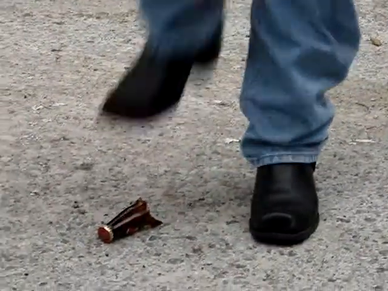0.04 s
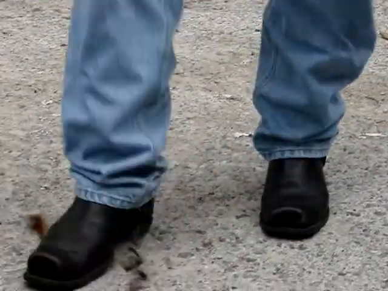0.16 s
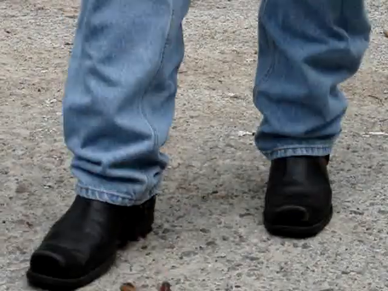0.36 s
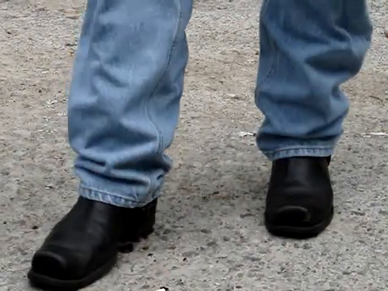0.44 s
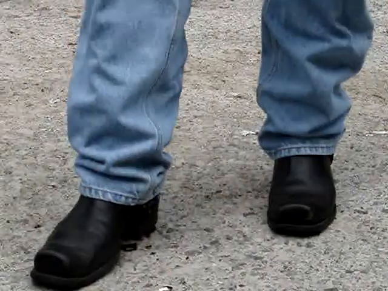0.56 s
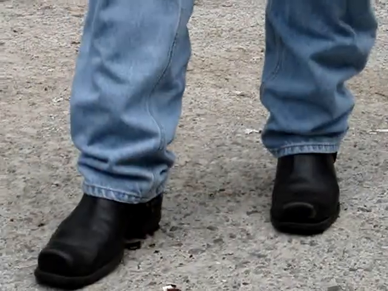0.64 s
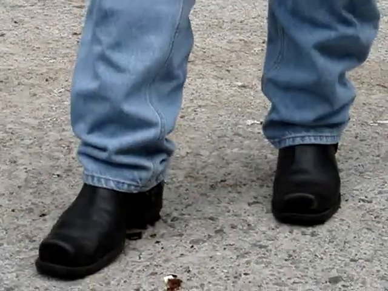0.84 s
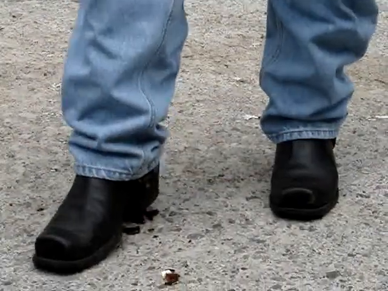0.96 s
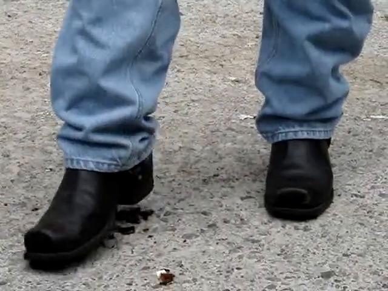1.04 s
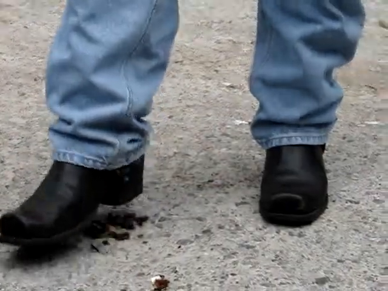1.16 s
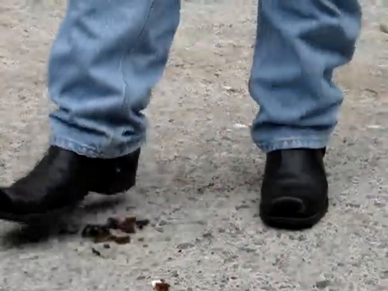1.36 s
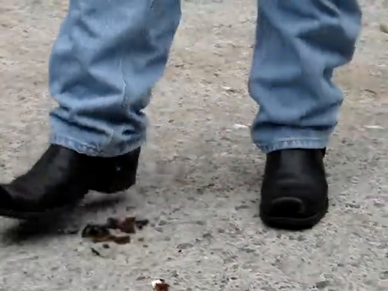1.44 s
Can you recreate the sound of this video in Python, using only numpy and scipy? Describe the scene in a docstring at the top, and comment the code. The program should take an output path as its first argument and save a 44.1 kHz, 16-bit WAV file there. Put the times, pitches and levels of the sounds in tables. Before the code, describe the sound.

Close by on outdoor pavement, a boot stomps and crushes a glass bottle neck. Flakes tinkle, a loose piece rolls away ringing and splinters crackle underfoot, with faint birds, light wind and a far-off roar behind.

```python
"""On open pavement, close to the microphone, a boot stamps on a glass bottle neck. The heel thuds, the
glass collapses in a few quick bursts of tiny fractures, flakes tinkle, a loose piece skitters away
ringing, and splinters crack as the foot shifts. Farther off, birds whistle over a distant roar, and
light wind rumbles on the microphone. Automatic gain drops at the blow and recovers slowly."""
import sys
import numpy as np
from scipy import signal
from scipy.fft import rfft, irfft
from scipy.io import wavfile
from scipy.ndimage import uniform_filter1d

SR = 44100
rng = np.random.default_rng(int(sys.argv[2]) if len(sys.argv) > 2 else 0)


def digitize_waveform(pressure):
    """Quantize a signal to 16-bit integers and store it at the path in sys.argv[1].

    Rows of a 2-D input are taken as channels; values are limited to [-1, 1].
    """
    field = np.atleast_2d(pressure).T
    bounded = np.clip(field, -1, 1)
    quanta = np.round(bounded * 32767).astype(np.int16)
    wavfile.write(sys.argv[1], SR, quanta)


N = 66150
T = np.arange(N) / SR


def undb(db):
    """Decibels to gain."""
    return 10 ** (np.asarray(db) / 20)


def unit(x):
    """Scale to rms 1."""
    return x / np.sqrt(np.mean(x ** 2) + 1e-18)


def curve(rows):
    """Gain along (s, dB) points."""
    return undb(np.interp(T, *np.array(rows).T))


def fade(start, t60):
    """A sudden start, then a fall of 60 dB every t60 seconds."""
    return (T >= start) * np.exp(-np.log(1000) * np.maximum(T - start, 0) / t60)


def noise():
    """White noise."""
    return rng.standard_normal(N)


def walk(rate_hz):
    """A smooth random wander with rms 1."""
    span = int(SR / rate_hz)
    return unit(uniform_filter1d(uniform_filter1d(noise(), span), span))


def band(x, hz, width):
    """One resonance; width is a share of the centre frequency."""
    w = 2 * np.pi * min(hz / SR, .45)
    a = np.sin(w) * width / 2
    return signal.lfilter([a, 0, -a], [1 + a, -2 * np.cos(w), 1 - a], x)


def lowpass(x, hz):
    """A gentle treble cut."""
    return signal.sosfilt(signal.butter(2, hz, fs=SR, output="sos"), x)


def colour(x, rows):
    """Causal filter through (Hz, dB) points."""
    hz, db = np.array(rows).T
    bins_hz = np.maximum(np.arange(N + 1) * SR / (2 * N), 1)
    gain = undb(np.interp(np.log(bins_hz), np.log(hz), db))
    cepstrum = irfft(np.log(gain))
    cepstrum[1:N] *= 2  # minimum phase: nothing sounds ahead of a hit
    cepstrum[N + 1:] = 0
    return irfft(rfft(x, 2 * N) * np.exp(rfft(cepstrum)))[:N]


def ticks(per_s, spread_db):
    """Random tiny fractures or contacts, most weak and a few strong."""
    impulses = (rng.random(N) < per_s / SR) * np.sign(noise())
    return impulses * undb(spread_db * np.minimum(rng.exponential(size=N), 4))


def echo(x, t60):
    """Diffuse reflections that build up and die away."""
    tail = noise() * fade(0, t60) * (1 - fade(0, 0.053))
    return signal.fftconvolve(x, tail / np.linalg.norm(tail))[:N]


# Colour of the roar from far off. Each row: frequency in Hz, gain in dB.
ROAR_COLOUR = [(18, -30.5), (30, -14.5), (70, -7.5), (325, -4), (414, -3), (673, -1.5), (1040, 2),
               (2110, -7.5), (2270, -7), (3600, -15.5), (4710, -21.5), (7120, -28.5), (7840, -27.5),
               (10000, -36), (13000, -39.5), (22000, -120)]
# The roar as heard, creeping slowly back up after the stamp. Each row: time in seconds, level in dB.
ROAR_LEVEL = [(0, -46), (.22, -45.5), (.45, -46), (.75, -45), (1.05, -44), (1.25, -43), (1.5, -44)]
def distant_roar():
    """A nearly steady outdoor roar with little treble."""
    return unit(colour(noise(), ROAR_COLOUR)) * curve(ROAR_LEVEL)


# Gusts at the microphone. Each row: time in seconds, level in dB.
WIND_LEVEL = [(0, -72), (.05, -51.5), (.15, -52.5), (.22, -51), (.3, -62), (.7, -85.5), (.8, -59),
              (1.5, -63)]
def wind(hz=103, width=2.4):
    """Light wind rumbles on the microphone."""
    rumble = band(band(noise(), hz, width), hz, width)
    return unit(rumble) * curve(WIND_LEVEL)


def whistle(start, length, first_hz, last_hz, db, bend=1.28, waver=0.00797, edge_s=0.0047):
    """One wavering slur of a bird's voice."""
    along = np.clip((T - start) / length, 0, 1)
    glide_hz = first_hz + (last_hz - first_hz) * along ** bend
    hz = glide_hz * (1 + waver * walk(149))
    swell = np.minimum(np.minimum(along, 1 - along) * length / edge_s, 1)
    return undb(db) * swell * np.sin(2 * np.pi * np.cumsum(hz) / SR)


# Song some way off. Each row: start and length in seconds, first and last pitch in Hz, level in dB.
SONG_NOTES = [(0.049, 0.034, 3380, 2893, -47.5), (0.068, 0.097, 3700, 3620, -54.5),
              (.075, 0.12, 2538, 2515, -53), (0.191, 0.14, 2540, 2573, -42.5),
              (0.545, 0.022, 3230, 2700, -37), (.611, .035, 3230, 2610, -36.5),
              (0.647, 0.082, 2430, 2353, -44.5), (.95, 0.049, 2720, 3020, -50),
              (1.118, 0.021, 2820, 2700, -43.5), (1.154, 0.031, 3100, 3164, -35),
              (1.187, 0.0081, 3400, 2980, -28), (1.188, 0.0332, 2790, 2693, -35.5),
              (1.229, 0.041, 2270, 2253, -42.5), (1.262, 0.062, 2360, 2383, -46)]
# A farther bird repeats one falling chip. Each entry: start in seconds.
CHIP_STARTS = [.859, 1.007, 1.143, 1.26, 1.359, 1.449]
def birds():
    """Distant song and farther chips, fluttering and smeared by echoes from the trees."""
    song = sum(whistle(*note) for note in SONG_NOTES)
    chips = sum(whistle(start, 0.033, first_hz=4480, last_hz=3460, db=-50.5) for start in CHIP_STARTS)
    direct = (song + chips) * undb(3 * walk(220))
    return direct + echo(undb(-1.5) * song + undb(0.5) * chips, t60=0.6)


# Flakes landing around the boot. Each row: time in seconds, level in dB.
FLAKE_LEVEL = [(.225, -79.5), (.235, -20), (.253, -39), (.263, -53), (.275, -30.5), (.325, -33.5),
               (.36, -42), (.42, -44), (.53, -50), (.63, -49), (.66, -87), (.73, -62.5), (.8, -92),
               (.88, -57.5), (1.0, -77), (1.15, -104)]
def flakes(count=22, low_hz=4250, high_hz=9760, width_hz=130, tilt_db_per_octave=-1.5):
    """A shower of small pieces, each tinkling at its own pitch whenever it touches the ground."""
    pitches = np.geomspace(low_hz, high_hz, count) * (1 + 0.03 * rng.standard_normal(count))
    tinkle = 0
    for hz in pitches:
        contacts = ticks(per_s=88, spread_db=7)
        gain = undb(tilt_db_per_octave * np.log2(hz / low_hz))
        tinkle += gain * band(contacts, hz, width_hz / hz)
    return unit(tinkle) * curve(FLAKE_LEVEL)


# One piece rolling over the pavement. Each row: time in seconds, level in dB.
ROLL_LEVEL = [(.27, -88), (.3, -34), (.42, -44.5), (.52, -50), (.62, -86), (.75, -81), (.89, -52.5),
              (.96, -57), (1.05, -76)]
def rolling_piece(hz=7560, width_hz=150):
    """Quick small contacts keep a piece singing as it rolls."""
    contacts = ticks(per_s=190, spread_db=3.6)
    return unit(band(contacts, hz, width_hz / hz)) * curve(ROLL_LEVEL)


# Loose pieces nearby. Each row: start in seconds, pitch in Hz, level in dB, free ring in seconds.
BOUNCES = [(.2742, 7770, -23, .005), (0.283, 7700, -20.5, 0.011), (.3065, 7720, -26, 0.0053),
           (.347, 7650, -30, 0.019), (0.3634, 6490, -24.5, .007), (.375, 7660, -28, 0.015),
           (.398, 6340, -22, .005), (0.3983, 9030, -23.5, 0.0092), (.58, 7675, -38.5, 0.063),
           (0.6785, 7680, -25, 0.013), (0.716, 7760, -26, 0.021), (0.794, 7750, -37.5, 0.0036),
           (0.8292, 7700, -24, 0.014), (0.87, 7640, -40.5, 0.018), (1.123, 5660, -36.5, .004),
           (1.19, 5590, -42, 0.0024), (1.211, 5600, -44, 0.0036)]
def bouncing_shards(rise_s=0.00048, stop_t60_s=0.0097, wander_hz=44.8):
    """Larger pieces ring until the next contact stops them, wobbling as they spin."""
    flutter = undb(0.5 * walk(450))
    wobble = np.cumsum(wander_hz * walk(504)) / SR
    out = 0
    for start, hz, db, length in BOUNCES:
        age = T - start
        ring = np.sin(2 * np.pi * (hz * age + wobble)) * fade(start, t60=0.21)
        rise = np.clip(age / rise_s, 0, 1)
        stop = np.exp(-np.log(1000) * np.maximum(age - length, 0) / stop_t60_s)
        out += undb(db) * ring * rise * stop
    return out * flutter


# Colour of the grit at close range. Each row: frequency in Hz, gain in dB.
GRIND_COLOUR = [(400, -17.5), (1500, 9), (3200, 18.5), (5000, 9.5), (7500, -15.5), (10000, -18.5)]
# Grinding as the foot shifts. Each row: time in seconds, level in dB.
GRIND_LEVEL = [(.25, -79), (.32, -39), (.42, -40.5), (.52, -49), (.635, -45), (.66, -74), (.73, -44.5),
               (.795, -57), (.83, -48.5), (.9, -56), (.98, -56), (1.02, -89), (1.125, -51), (1.17, -46),
               (1.28, -99.5)]
def grit():
    """Grit ground between sole and pavement gives a dense crackle."""
    crackle = colour(ticks(per_s=2200, spread_db=3), GRIND_COLOUR)
    return unit(crackle) * curve(GRIND_LEVEL)


# Cracks under the sole, close by. Each row: start in seconds, level in dB, centre frequency in Hz.
SPLINTER_CRACKS = [(0.232, -0.5, 3760), (0.2321, -2.5, 2960), (0.2373, -10, 3080), (0.251, -1.5, 2180),
                   (.2544, 0.5, 3180), (0.2705, -7, 3500), (0.2728, -5, 2540), (0.3286, -14, 4300),
                   (0.348, -16, 5100), (0.362, -11, 5000), (.4131, -11.5, 3480), (0.4491, -18, 4000),
                   (0.4866, -22, 3930), (0.5116, -19, 6500), (.525, -17.5, 3980), (.5342, -22, 6000),
                   (0.569, -16, 5500), (0.603, -24, 4960), (0.6095, -18.5, 5600), (0.6783, -15, 4200),
                   (0.7131, -17.5, 6500), (0.718, -18, 8000), (0.7355, -15, 4470), (0.7378, -11.5, 4100),
                   (0.7581, -22.5, 7000), (0.771, -23, 7100), (.8228, -13, 7800), (0.8262, -11, 8500),
                   (.866, -31, 6070), (.889, -26.5, 7900), (0.9292, -16.5, 4440), (.9466, -22.5, 4500),
                   (0.9779, -23, 3900), (0.9974, -24, 5900), (1.0372, -16.5, 5670), (1.0604, -12.5, 4300),
                   (1.0678, -18.5, 3350), (1.085, -26.5, 3400), (1.1157, -21.5, 4500), (1.1272, -18, 4380),
                   (1.191, -31, 5000), (1.211, -32, 5400)]
def splinters():
    """Each sharp crack sprays dust and briefly rings a splinter of its own size."""
    out = 0
    for start, db, hz in SPLINTER_CRACKS:
        snap = undb(-13) * noise() * fade(start, t60=0.022)  # the dust
        snap[int(start * SR)] -= 2  # the break itself
        ring_hz = hz * np.exp(0.2 * rng.uniform(-1.02, 1))
        crack = band(snap, hz, width=0.59) + undb(4) * band(snap, ring_hz, width=0.071)
        out += undb(db) * crack * np.sqrt(SR / (3 * np.pi * hz))  # evens out low and high cracks
    return out


# Heel and sole landing close by. Each row: start in seconds, level in dB, 60 dB decay in seconds.
FOOTFALLS = [(0.2298, -22.5, 0.083), (0.272, -30, 0.064)]
def boot(stamp_s=0.2306, push_s=0.002, puff_s=0.258, puff_rise_s=0.019):
    """The heel pushes once, the sole thuds twice, and air is squeezed out as it settles."""
    push = np.sin(np.pi * np.clip((T - stamp_s) / push_s, 0, 1)) ** 2
    thuds = sum(undb(db) * unit(band(noise(), hz=320, width=1.06)) * fade(start, t60)
                for start, db, t60 in FOOTFALLS)
    puff_age = np.maximum(T - puff_s, 0) / puff_rise_s
    puff = puff_age * np.exp(1 - puff_age)
    return undb(-13.5) * push + thuds + undb(-34.5) * puff


# Stages of the collapse, close to the microphone.
# Each row: start in seconds, level in dB, 60 dB decay in seconds, treble corner in Hz.
STAGES = [(0.2313, -15, 0.15, 8400), (.2472, -17, 0.034, 7340), (.268, -24, .17, 4200),
          (0.294, -31.5, .3, 8150), (0.318, -35, 0.19, 9160)]
# Colour of breaking glass at close range. Each row: frequency in Hz, gain in dB.
CRUNCH_COLOUR = [(150, -21), (400, 1.5), (900, -2.5), (1400, 3.5), (2100, -6.5), (3100, 0.5), (4500, -2.5),
                 (6500, 4), (8000, -0.5), (10000, -11)]
# Modes of the bottle neck. Each row: pitch in Hz, level in dB, 60 dB decay in seconds.
NECK_MODES = [(783, -25, 0.26), (808.6, -29.5, 0.24), (1118, -24.5, 0.12), (1865, -24.5, 0.23),
              (2001, -24.5, 0.17), (2520, -28.5, 0.051), (2740, -23.5, 0.15), (3050, -27, 0.3),
              (3050, -22, .25), (3140, -29, .2), (4368, -26, 0.072)]
def collapse(wander=0.0067, flutter_db=2.5):
    """Each stage is a swarm of fractures; the neck rings unsteadily as it gives way."""
    out = 0
    for start, db, t60, corner_hz in STAGES:
        swarm = colour(ticks(per_s=8000, spread_db=2.5), CRUNCH_COLOUR)
        out += undb(db) * unit(lowpass(swarm, corner_hz)) * fade(start, t60)
    first_break_s = STAGES[0][0]
    for hz, db, t60 in NECK_MODES:
        turns = np.cumsum(hz * (1 + wander * walk(153))) / SR
        level = undb(db + flutter_db * walk(120)) * fade(first_break_s, t60)
        out += level * np.sin(2 * np.pi * turns)
    return out


def scene():
    """One microphone on open ground: glass and boot close by, birds and roar behind."""
    glass = collapse() + grit() + splinters() + flakes() + rolling_piece() + bouncing_shards()
    return (glass + boot() + birds() + distant_roar() + wind())[None]


def record(dry, threshold_db=-21, max_cut_db=9, recover_db_per_s=1.5, gain_db=5, top_hz=10020):
    """Automatic gain drops at once on a loud sound and creeps back; the top is cut steeply."""
    power = uniform_filter1d(dry[0] ** 2, size=220)  # over 5 ms
    level_db = 10 * np.log10(np.maximum(power, 1e-12))
    wanted_cut_db = np.clip(level_db - threshold_db, 0, max_cut_db)
    recovery_db = recover_db_per_s * T
    cut_db = np.maximum.accumulate(wanted_cut_db + recovery_db) - recovery_db
    treble_cut = signal.ellip(12, .2, 70, top_hz, fs=SR, output="sos")
    return signal.sosfilt(treble_cut, dry * undb(gain_db - cut_db))


dry = scene()
out = record(dry)
digitize_waveform(out)
```